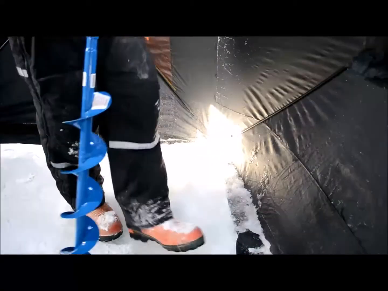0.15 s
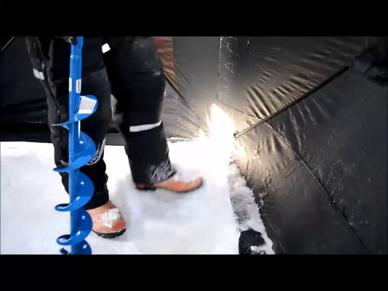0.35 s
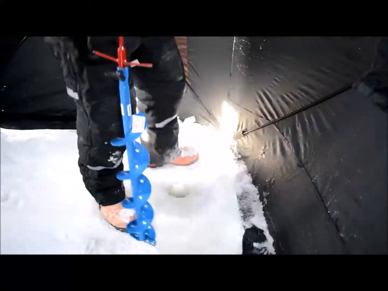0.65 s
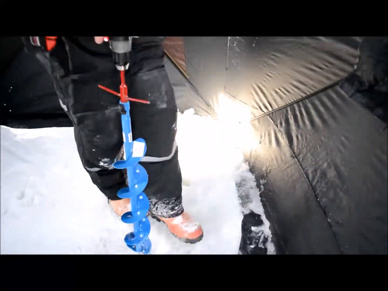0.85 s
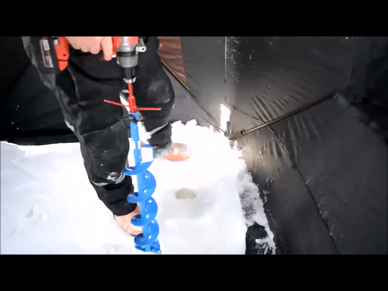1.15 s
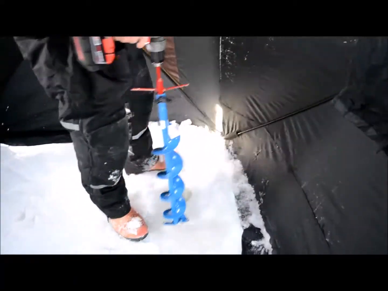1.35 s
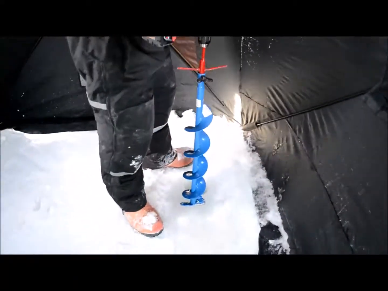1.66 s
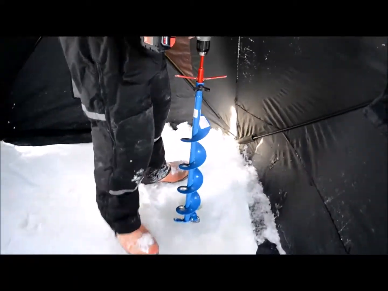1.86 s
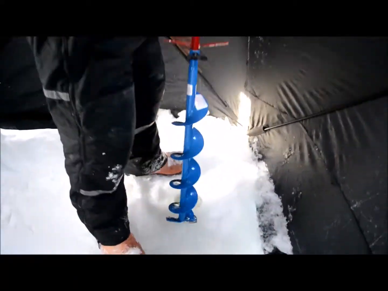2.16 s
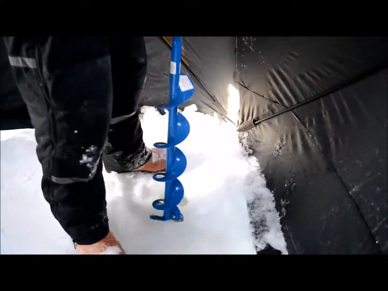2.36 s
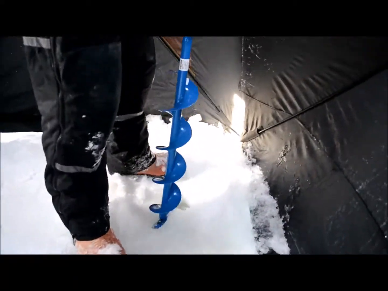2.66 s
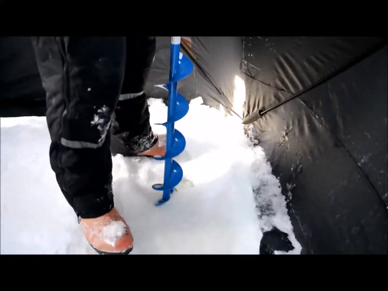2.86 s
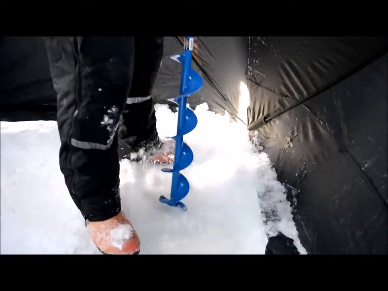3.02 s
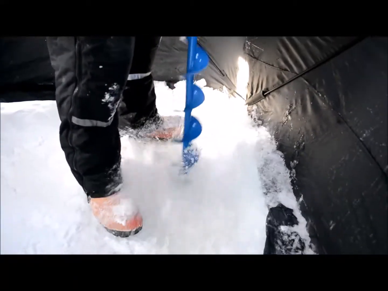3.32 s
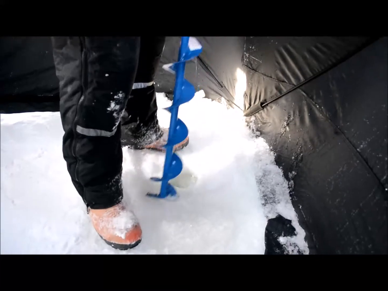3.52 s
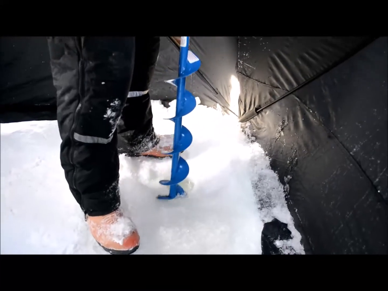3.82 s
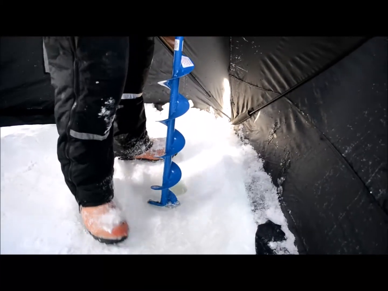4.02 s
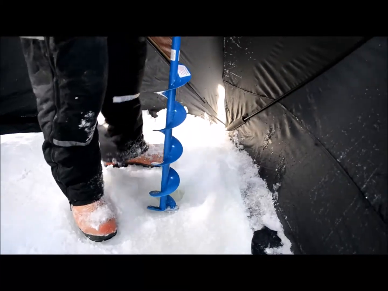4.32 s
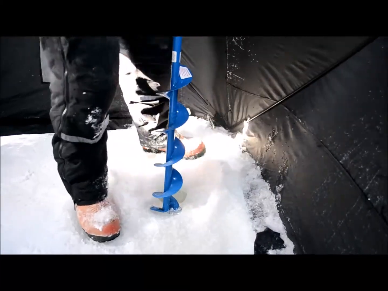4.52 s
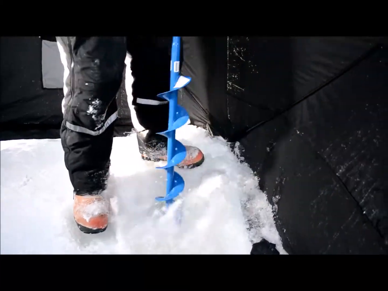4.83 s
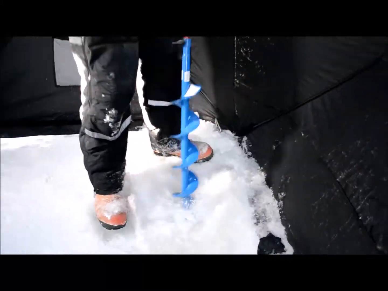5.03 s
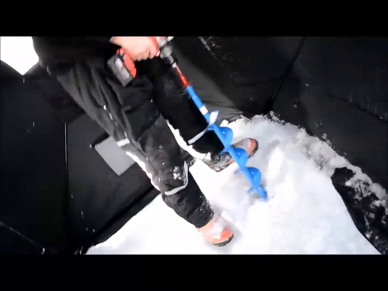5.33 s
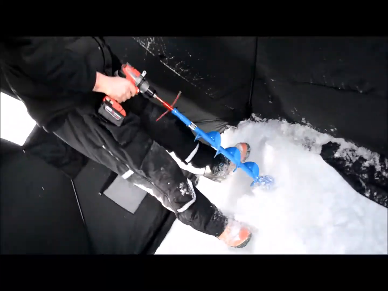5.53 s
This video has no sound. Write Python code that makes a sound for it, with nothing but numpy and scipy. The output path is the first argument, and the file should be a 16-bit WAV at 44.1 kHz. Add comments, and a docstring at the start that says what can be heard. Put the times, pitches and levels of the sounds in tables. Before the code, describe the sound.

Snow scuffs and dull crunchy knocks give way to brief whining, rattling drill pulls, with a loose metal auger clattering as it spins.

```python
"""Inside a fishing tent, boots scuff the snow and a winter suit rustles over faint air and a far hum.
Soon an auger and boots knock on packed snow: banded noise grains, crunchy with a short ring.
Then a cordless drill turns the auger in seven short pulls: whine tones, rattle noise and a starting jolt.
During the pulls the loose steel shaft clanks in the chuck, as noise bursts through damped modes.
Scuffs, rustles and knocks return between pulls; the tent adds a very short tail."""
import sys
import numpy as np
from scipy import signal
from scipy.fft import rfft, irfft, next_fast_len
from scipy.io import wavfile
from scipy.ndimage import uniform_filter1d, map_coordinates

SR = 44100
rng = np.random.default_rng(int(sys.argv[2]) if len(sys.argv) > 2 else 0)


def waveform_to_disk(signal):
    """Save audio, clipped to [-1, 1], as 16-bit WAV at the path in sys.argv[1]."""
    frames = np.transpose(np.atleast_2d(signal))
    scaled = np.clip(frames, -1, 1) * 32767
    samples = np.round(scaled).astype(np.int16)
    wavfile.write(sys.argv[1], SR, samples)


N = 250488

# Leg movements, a boot slide and a suit swish each: start_s, length_s, scuff_db, cloth_db
LEG_STROKES = [(0, .06, -69, -69), (0.065, 0.042, -59.5, -61.5), (0.133, 0.1, -65, -80),
               (0.257, 0.051, -54.5, -53), (.33, 0.053, -67, -60.5), (0.363, 0.11, -60, -57),
               (0.484, 0.088, -56, -58.5), (0.574, 0.14, -59, -70), (0.714, .08, -54.5, -58),
               (0.783, 0.068, -53.5, -54), (0.872, 0.082, -58.5, -61), (0.969, 0.093, -53.5, -57.5),
               (1.067, .19, -63, -63), (1.38, .045, -64.5, -61.5), (1.422, 0.037, -52, -70),
               (1.554, 0.023, -81, -71), (1.69, 0.044, -66.5, -82), (1.83, 0.091, -55.5, -68),
               (1.922, 0.13, -63, -61), (2.083, 0.051, -52.5, -65.5), (2.205, 0.11, -73.5, -71),
               (2.328, 0.081, -64, -69), (2.438, 0.06, -61, -66), (2.666, 0.053, -61.5, -64.5),
               (2.865, .04, -67, -62.5), (2.999, 0.096, -67.5, -68.5), (3.452, .1, -65, -67.5),
               (3.6, 0.12, -71.5, -99), (3.846, 0.027, -72, -65.5), (3.913, 0.017, -64, -55),
               (4.058, .085, -57.5, -58), (4.176, 0.019, -74, -69.5), (4.267, 0.1, -67.5, -69.5),
               (4.473, 0.058, -63, -61.5), (4.59, 0.062, -65.5, -62), (4.662, .07, -59.5, -60.5),
               (4.904, 0.035, -52, -63.5), (5.191, 0.032, -51, -65)]
# Weight coming down on a boot: peak_s, level_db
WEIGHT_SHIFTS = [(.305, -70), (.42, -72), (.53, -72), (.82, -65.5), (1.02, -70), (1.45, -81), (1.84, -74),
                 (1.98, -67), (2.06, -76), (2.535, -70), (3.4, -67), (3.59, -67.5), (4.1, -84), (4.95, -69),
                 (5.33, -56)]
# Relative spectrum of boots on snow: freq_hz, level_db
SCUFF_SPECTRUM = [(200, -34), (600, -16), (1400, -1), (3000, 0.5), (4500, -3), (7000, -20.5), (15000, -46)]
# Relative spectrum of sliding cloth, also of crust crackle: freq_hz, level_db
CLOTH_SPECTRUM = [(1500, -39), (3500, -7), (6000, -3), (8500, -6.5), (11000, -11.5), (14000, -13),
                  (15500, -9)]
# Relative spectrum of low thuds and treads: freq_hz, level_db
THUD_SPECTRUM = [(30, -33), (100, -32.5), (220, -14.5), (400, -2), (700, -5), (1300, -1.5), (3000, -41)]
# Relative spectrum of outdoor air: freq_hz, level_db
AIR_SPECTRUM = [(15, -54), (25, -27), (193, -15.5), (848, -5), (1450, -6), (1570, -3.5), (1750, -10.5),
                (2170, -3.5), (2850, -6), (3260, -7.5), (13900, -45), (15500, -16)]
# Auger and boots on packed snow: start_s, level_db, thud_db, crackle_db, ring_hz, ring_db
SNOW_KNOCKS = [(0.266, -55, -40, 0, 2980, -8), (0.838, -35.5, -36, -13, 2960, -17),
               (1.042, -35.5, -29, -15, 1800, 1.5), (1.152, -52.5, -16, -18, 1580, 12),
               (1.264, -41, -47, -28, 1630, -7), (1.382, -48.5, -24, -8, 4880, -5),
               (1.467, -40, -37, -27, 2150, 1), (1.582, -43.5, -35, -5.5, 4080, 7.5),
               (1.705, -41, -39, -35, 2700, -4), (1.828, -48, -22.5, -20, 2780, -5),
               (1.86, -49, -19, -32, 2090, 8.5), (1.924, -46, -27, -9, 2540, 6),
               (2.043, -55, -9.5, -18, 1600, -1), (2.063, -31, -25, -20, 1600, 1),
               (2.095, -28, -32.5, -29, 3300, -7), (2.301, -37, -57, -34, 2230, -5),
               (2.328, -41, -29.5, -6.5, 1460, -4.5), (3.583, -40, -30, -9.5, 2920, 6),
               (3.916, -38, -62, -8.5, 2980, -11), (3.947, -41, -58, -4.5, 3030, 5.5),
               (3.964, -44.5, -50, -18, 3850, 12), (4.056, -51, -20.5, 0, 4400, -9),
               (4.134, -39, -39, -0.5, 3570, 10), (4.171, -40, -52, -7, 3800, 4.5),
               (4.28, -50, -23.5, -15, 2720, -5), (4.562, -43.5, -27.5, -15, 3840, 3),
               (4.589, -39, -35, -8.5, 3030, -1)]
# Relative spectrum of breaking crust: freq_hz, level_db
CRUNCH_SPECTRUM = [(200, -44), (700, -32), (1400, 4.5), (2900, 5.5), (4300, 5), (6500, -9), (15000, -29)]
# Trigger pulls: start_s, take_up_s, held_s, coast_s, whine_hz, drift_hz_per_s,
# level_db, high_tones_db, low_whine_db
TRIGGER_PULLS = [(2.484, 0.02, 0.093, .058, 1242, -5.5, -40.5, -3, -18.5),
                 (2.893, 0.0098, 0.079, .06, 1225, -1.5, -40, -3.5, -22),
                 (3.097, 0.0086, .26, 0.074, 1185, 270, -42, 0.5, -21),
                 (4.726, 0.0094, .123, 0.067, 1150, -7, -41.5, -3.5, -26.5),
                 (4.963, 0.0082, .118, .045, 1265, 0, -41, -2, -20),
                 (5.108, 0.0074, 0.094, 0.067, 1332, -5.5, -44.5, -8, -39),
                 (5.277, 0.013, 0.45, .07, 1273, -300, -41.5, -1.5, -28)]
# Higher gear and motor tones: whine_multiple, relative_level_db
GEAR_TONES = [(1.5, -40), (2.002, -14.5), (2.43, -11.5), (3.002, -27), (4, -6.5), (5.56, -2)]
# Gearbox resonances: centre_hz, width_hz, level_db
HOUSING_MODES = [(1482, 51, 9), (2560, 73, 0), (2800, 550, -6), (3856, 210, 5), (5180, 830, 4.5),
                 (6360, 800, -6)]
# Relative spectrum of grinding gears, also of shaft chatter: freq_hz, level_db
GRIND_SPECTRUM = [(30, -43), (200, -54), (450, -27), (800, -25), (1150, -17.5), (2000, -1.5), (3200, -1),
                  (5000, -3.5), (7500, 1.5), (10000, -4), (12000, -8), (14000, -5.5), (15400, -5.5)]
# Shaft striking the chuck: start_s, level_db, favoured_ring_hz
SHAFT_CLANKS = [(2.505, -38.5, 3600), (2.5755, -37.5, 3850), (3.1812, -32, 2500), (3.2728, -28.5, 2395),
                (3.3055, -34, 3723), (3.352, -30, 2415), (3.393, -28.5, 3570), (3.415, -32.5, 2410),
                (3.4393, -36.5, 2430), (4.7381, -26.5, 3000), (4.7804, -30.5, 2660), (4.825, -26.5, 2960),
                (4.9894, -27.5, 2293), (5.0538, -27.5, 2810), (5.077, -31, 3050), (5.1179, -33.5, 1473),
                (5.141, -28, 2965), (5.1965, -35.5, 3050), (5.3008, -36, 3755), (5.336, -29.5, 4050),
                (5.3719, -32.5, 3100), (5.4241, -32.5, 2988), (5.4953, -32.5, 2444), (5.5144, -26, 3023),
                (5.5776, -33, 2436), (5.6124, -32, 2897), (5.6434, -35, 2666)]
# Shaft modes: freq_hz, relative_level_db, t60_s
SHAFT_MODES = [(1412, 5, 0.17), (1890, -31, 0.064), (2206, 5.5, 0.033), (2417, 12, 0.054),
               (2823, 17.5, 0.038), (3040, 13.5, 0.071), (3080, -3, 0.09), (3640, 7, 0.11),
               (4334, 10, 0.072), (5100, -13, .05)]
# Decay of the tent's answer: freq_hz, t60_s
TENT_DECAY = [(200, 0.053), (2000, 0.053), (12000, 0.13)]

STROKE_ATTACK_S, STROKE_RELEASE_S = 0.02, 0.029
FIDGET_SCUFF_DB, FIDGET_CLOTH_DB = -75.5, -79  # boots and suit are never quite still
TREAD_LOAD_S, TREAD_SETTLE_S = 0.019, 0.023  # weight builds up; snow settles
KNOCK_RISE_S, KNOCK_T60_S = 0.002, 0.07  # slowest packing of the snow; crunch decay
WANDER_SHARE = 0.008  # speed wavers as the blades catch and skate
KICK_HZ, SPIN_UP_S = 724, 0.021  # whine as the gears engage; time constant up to speed
INRUSH_DB, INRUSH_S = 7.5, 0.053  # extra torque while the auger gathers speed
COAST_DB = 27.5  # lost per coast time after the trigger is let go
UNSETTLED_DB, SETTLE_S = 5.5, 0.11  # high tones are weak until the load settles
# before each clank the shaft turns through its play and the gears run unloaded
SLIP_DB, SLIP_LEAD_S, SLIP_S = 2.5, 0.014, 0.0099
TOP_HZ = 15850


def amp(db):
    """Decibels to gain."""
    return 10 ** (np.asarray(db) / 20)


def unit(x):
    """Scale to rms 1."""
    return x / np.sqrt(np.mean(x ** 2) + 1e-20)


def along(points, hz):
    """Read (freq_hz, value) points on a log frequency axis."""
    point_hz, value = np.transpose(points)
    return np.interp(np.log(hz + 1), np.log(point_hz + 1), value)


def wobble(rate_hz):
    """Smooth random curve with rate_hz random knots a second."""
    knots = np.arange(0, N * rate_hz / SR + 1, 1 / 8)
    smooth = map_coordinates(rng.standard_normal(int(knots[-1]) + 4), [knots])
    return np.interp(np.arange(N) * rate_hz / SR, knots, smooth)


def filtered(x, response):
    """Apply a complex response of frequency to x."""
    size = next_fast_len(len(x) + 8192)
    spectrum = rfft(x, size) * response(np.fft.rfftfreq(size, 1 / SR))
    return irfft(spectrum, size)[:len(x)]


def coloured(x, spectrum):
    """Shape x by a relative spectrum, at rms 1."""
    return unit(filtered(x, lambda hz: amp(along(spectrum, hz))))


def grains(rate_hz, spread_db, share, size=N):
    """Tiny impacts of uneven size at random moments, on a bed of smooth noise."""
    moments = rng.random(size) < rate_hz / SR
    sizes = amp(spread_db * np.clip(rng.standard_normal(size), -2, 2))
    hits = moments * rng.choice([-1, 1], size) * sizes
    share = np.clip(share, 0, 1)  # power share of the impacts
    return np.sqrt(share) * unit(hits) + np.sqrt(1 - share) * rng.standard_normal(size)


def resonance(hz, centre_hz, width_hz):
    """Response of one damped mode."""
    return 1j * hz * width_hz / (centre_hz ** 2 - hz ** 2 + 1j * hz * width_hz)


def thin(hz):
    """Bass loss of small radiating parts: a fourth-order high-pass."""
    return (1j * hz / (1j * hz + 600)) ** 4


def patchy(x, depth_db, size):
    """Let the colour of x shift from moment to moment, in patches size bins wide."""
    z = signal.stft(x, nperseg=512)[2]
    field = uniform_filter1d(rng.standard_normal(z.shape), size, axis=0)
    field = uniform_filter1d(field, size=3, axis=1)
    return unit(signal.istft(z * amp(depth_db * unit(field)), nperseg=512)[1][:N])


def swell(start_s, length_s, attack_s, release_s):
    """Envelope that rises, holds until length_s is over and dies away."""
    age_s = np.arange(N) / SR - start_s
    return np.clip(age_s / attack_s, 0, 1) * np.exp(-np.maximum(age_s - length_s, 0) / release_s)


def movement(scuff_db=-1, cloth_db=1.0, tread_db=-3, drag_db=-19):
    """Snow grinds under the boots, stiff cloth slides, and weight shifts from foot to foot."""
    t = np.arange(N) / SR
    scuff, cloth = amp(FIDGET_SCUFF_DB), amp(FIDGET_CLOTH_DB)
    for start_s, length_s, boot_db, suit_db in LEG_STROKES:
        stroke = swell(start_s, length_s, STROKE_ATTACK_S, STROKE_RELEASE_S)
        scuff = np.hypot(scuff, amp(boot_db) * stroke)
        cloth = np.hypot(cloth, amp(suit_db) * stroke)
    weight = 0
    for peak_s, db in WEIGHT_SHIFTS:
        distance = np.maximum((peak_s - t) / TREAD_LOAD_S, (t - peak_s) / TREAD_SETTLE_S)
        weight = weight + amp(db) * np.exp(-distance)
    catch = amp(0.8 * wobble(60))  # both surfaces catch and slip
    clumps = amp(2 * wobble(250))  # snow crystals break in clusters
    snow = coloured(clumps * grains(rate_hz=1200, spread_db=2.5, share=0.32), SCUFF_SPECTRUM)
    suit = coloured(grains(rate_hz=2000, spread_db=1, share=0.59), CLOTH_SPECTRUM)
    snow = patchy(snow, depth_db=2.8, size=5)
    suit = patchy(suit, depth_db=1.5, size=8)
    steps = coloured(grains(rate_hz=200, spread_db=5, share=0.5), THUD_SPECTRUM)
    tread = (amp(tread_db) * weight + amp(drag_db) * scuff) * steps  # sliding boots rumble too
    return catch * (amp(scuff_db) * scuff * snow + amp(cloth_db) * cloth * suit) + tread


def background(air_db=-74, hum_db=-93, hum_hz=215):
    """Faint outdoor air as shaped noise, and a far hum wavering in phase and level."""
    phase = 2 * np.pi * hum_hz * np.arange(N) / SR + 0.9 * wobble(40)
    hum = np.sin(phase) * amp(3 * wobble(14))
    air = coloured(rng.standard_normal(N), AIR_SPECTRUM)
    return amp(air_db) * air + amp(hum_db) * hum


def knocks(crunch_db=-15, thud_db=2, crackle_db=-5, ping_db=-14, crush_s=0.0048):
    """Snow packs, then the crust gives way: crunch, short ring, thud beneath, crackle above."""
    lead = SR // 50
    out, t = np.zeros(N + SR), (np.arange(SR // 4) - lead) / SR
    for start_s, db, low_db, high_db, ring_hz, ring_db in SNOW_KNOCKS:
        crust = lambda: grains(rate_hz=3000, spread_db=2.5, share=0.96, size=len(t))
        ring = lambda hz: thin(hz) * resonance(hz, ring_hz, ring_hz / 7)
        blow = amp(crunch_db) * coloured(crust(), CRUNCH_SPECTRUM)
        blow += amp(thud_db + low_db) * coloured(crust(), THUD_SPECTRUM)
        blow += amp(crackle_db + high_db) * coloured(crust(), CLOTH_SPECTRUM)
        blow += amp(ping_db + ring_db) * unit(filtered(crust(), ring))
        force = amp(db + 42)  # blows above -42 dB rise faster
        packing = np.exp(np.minimum(t, 0) * np.maximum(force, 1) / KNOCK_RISE_S)
        fade = amp(-60 * np.maximum(t - crush_s, 0) / KNOCK_T60_S)
        out[round(start_s * SR) - lead:][:len(t)] += amp(db) * packing * fade * blow
    return out[:N]


def motor():
    """Each pull surges up to speed, holds and coasts; the gears take up their slack a moment later."""
    t, pulls = np.arange(N) / SR, np.array(TRIGGER_PULLS)
    latest = np.maximum(np.searchsorted(pulls[:, 0], t) - 1, 0)
    start_s, take_up_s, held_s, coast_s, top_hz, drift, db, sing_db, mesh_db = pulls[latest].T
    age_s = np.maximum(t - start_s, 0)
    coasted = np.maximum(age_s - held_s, 0) / coast_s
    driven_hz = top_hz + drift * np.minimum(age_s, held_s)
    driven_hz -= (top_hz - KICK_HZ) * np.exp(-age_s / SPIN_UP_S)
    slipping = sum(np.exp(-((t - s + SLIP_LEAD_S) / SLIP_S) ** 2) for s, _, _ in SHAFT_CLANKS)
    load_db = INRUSH_DB * np.exp(-age_s / INRUSH_S) - SLIP_DB * slipping - COAST_DB * coasted
    engaged = 1 - np.exp(-(age_s / take_up_s) ** 2)
    sing_db = sing_db - UNSETTLED_DB * np.exp(-age_s / SETTLE_S)
    return driven_hz * np.exp(-coasted), amp(db + load_db), engaged, sing_db, mesh_db, age_s


def drill(grind_db=-2.5, housing_db=-6, whine_db=0, jolt_db=-2, jolt_hz=5100, jolt_s=0.006,
          mesh_depth=0.078, flutter_share=0.00653):
    """Gear teeth rattle the housing and sing at multiples of the speed."""
    whine_hz, gain, engaged, sing_db, mesh_db, age_s = motor()
    speed = 1 + flutter_share * wobble(120) + WANDER_SHARE * wobble(25)
    cycles = np.cumsum(whine_hz * speed) / SR
    # teeth bite harder once per motor turn, four whine cycles
    bite = 1 + mesh_depth * np.cos(np.pi * cycles / 2)
    grind = coloured(bite * grains(rate_hz=5000, spread_db=-3, share=0.39), GRIND_SPECTRUM)

    def housing(hz):
        """Sum of gearbox modes with alternating signs."""
        modes = sum((-1) ** k * amp(db) * resonance(hz, centre_hz, width_hz)
                    for k, (centre_hz, width_hz, db) in enumerate(HOUSING_MODES))
        return thin(hz) * modes

    ring = filtered(bite * grains(rate_hz=3300, spread_db=6.5, share=0.23), housing)
    grind = patchy(grind, depth_db=2.3, size=4)
    ring = patchy(ring, depth_db=3.5, size=3)
    judder = amp(1.4 * wobble(80))
    rattle = (amp(grind_db) * grind + amp(housing_db) * ring) * judder
    # backlash smears each tone, most when the load is unsteady
    backlash_rad = 0.13 * amp(-sing_db / 2)
    tones = 0
    for multiple, db in GEAR_TONES:
        level = amp(db - 1 + 4.2 * wobble(70))
        phase = 2 * np.pi * multiple * cycles + backlash_rad * multiple * wobble(500)
        tones = tones + level * np.sin(phase)
    # tones come forward near full speed
    whine = amp(whine_db + sing_db) * np.sqrt(2) * tones * np.minimum(whine_hz / 1200, 1) ** 4
    mesh = np.sqrt(2) * np.sin(2 * np.pi * cycles + 0.3 * wobble(300))
    mesh *= amp(mesh_db + 2.5 * wobble(60)) * np.minimum(whine_hz / 1150, 1) ** 8
    # starting torque jolts the motor case into a short, high ring
    starting = (age_s / jolt_s) ** 2 * np.exp(-age_s / jolt_s)
    case = filtered(rng.standard_normal(N), lambda hz: resonance(hz, jolt_hz, 560) ** 2)
    jolt = amp(jolt_db) * starting * unit(case)
    return gain * (engaged * (rattle + whine + mesh) + jolt)


def clanks(ring_db=-14, chatter_db=-8, chatter_t60_s=0.13, contact_t60_s=0.037, favour_db=8,
           chatter_rise_s=0.0038):
    """Steel chatters briefly on steel; where it lands decides which modes are favoured."""
    out, t = np.zeros(N + SR), np.arange(SR // 4) / SR
    for start_s, db, ring_hz in SHAFT_CLANKS:
        grip = rng.normal(1, 0.012)  # changing grip of the chuck shifts the modes
        modes = 0
        for hz, mode_db, t60_s in SHAFT_MODES:
            favour = favour_db * np.exp(-((hz - ring_hz) / 150) ** 2)
            level = amp(mode_db + favour + rng.normal(0, 3) - 60 * t / t60_s)
            modes = modes + level * np.sin(2 * np.pi * grip * hz * t)
        contact = grains(rate_hz=1200, spread_db=-4, share=1.0, size=len(t))
        contact *= amp(-60 * t / contact_t60_s)
        ring = filtered(signal.fftconvolve(contact, modes)[:len(t)], thin)
        ring /= np.sqrt(np.mean(ring[:SR // 50] ** 2))  # rms 1 over the first 20 ms
        chatter = coloured(rng.standard_normal(len(t)), GRIND_SPECTRUM)
        chatter *= amp(-60 * t / chatter_t60_s) * np.minimum(t / chatter_rise_s, 1)
        clank = amp(ring_db) * ring + amp(chatter_db) * chatter
        out[round(start_s * SR):][:len(t)] += amp(db) * clank
    return out[:N]


def tent(x):
    """Fabric walls and ice give a very short answer: decaying noise, 5 ms late."""
    hz, t, z = signal.stft(rng.standard_normal(SR // 4), SR, nperseg=256)
    decay = amp(-60 * t / along(TENT_DECAY, hz)[:, None])
    tail = signal.istft(z * decay, SR, nperseg=256)[1]
    return signal.fftconvolve(np.pad(x, (SR // 200, 0)), tail / np.linalg.norm(tail))[:N]


def scene(tent_db=-12):
    """All sources in the small tent."""
    near = movement() + knocks() + drill() + clanks()
    return (near + amp(tent_db) * tent(near) + background())[None]


def record(dry, ceiling_db=-35):
    """Fast gain control holds loud moments level; nothing passes above the band limit."""
    x = dry[0]
    loudness = np.sqrt(np.abs(uniform_filter1d(x ** 2, size=SR // 100)))
    gain = (1 + (loudness / amp(ceiling_db)) ** 4) ** (-1 / 4)
    return filtered(gain * x, lambda hz: hz < TOP_HZ)[None]


dry = scene()
out = record(dry)
waveform_to_disk(out)
```